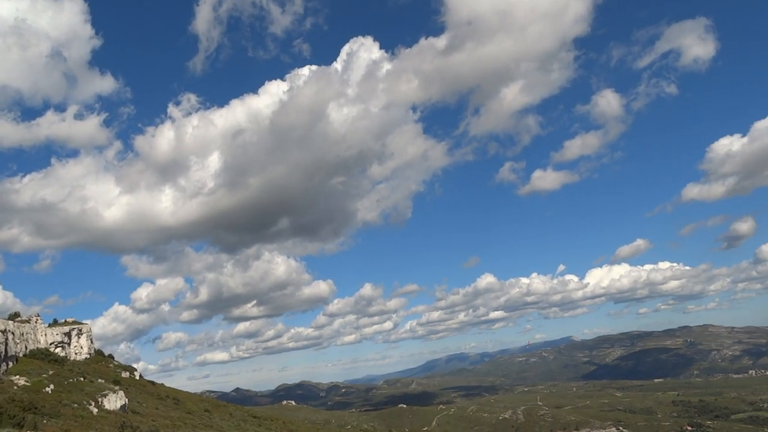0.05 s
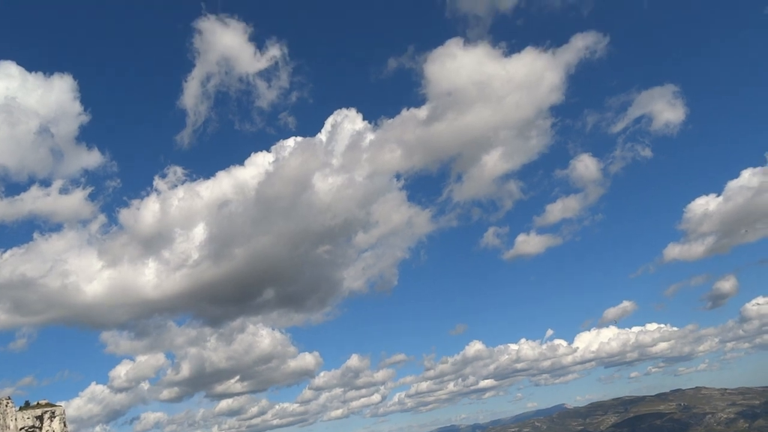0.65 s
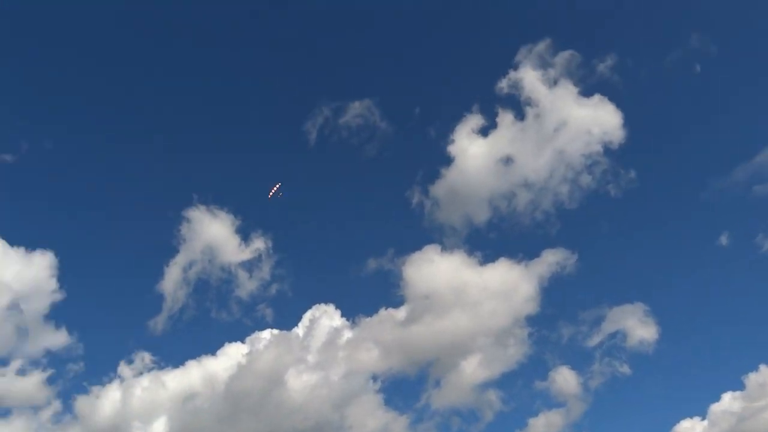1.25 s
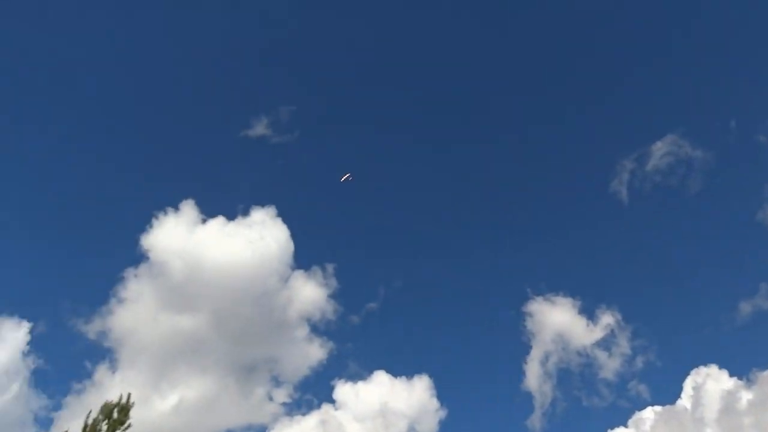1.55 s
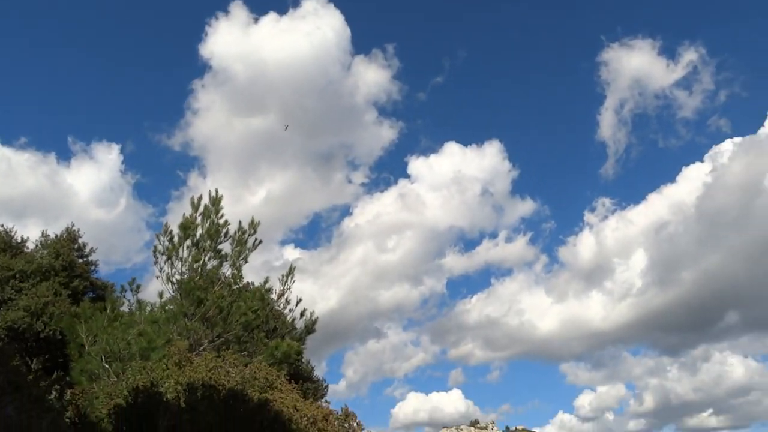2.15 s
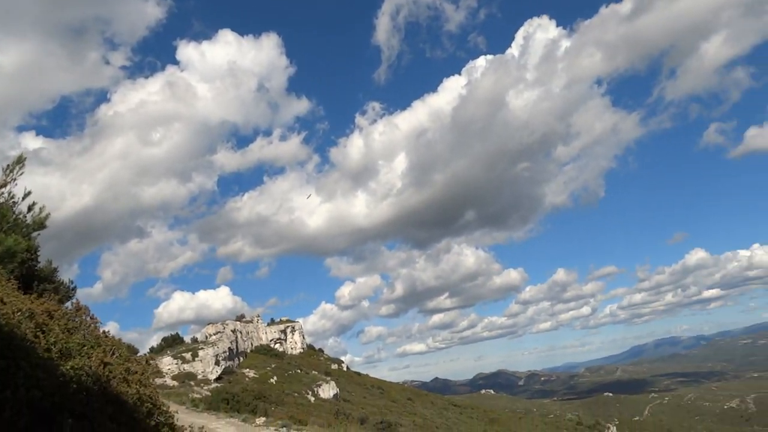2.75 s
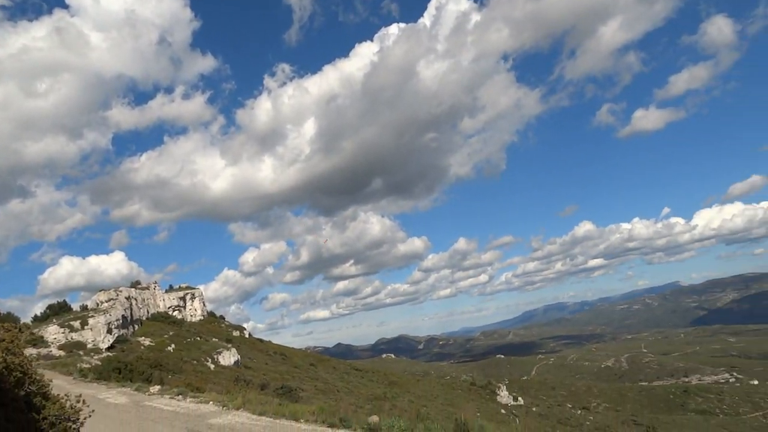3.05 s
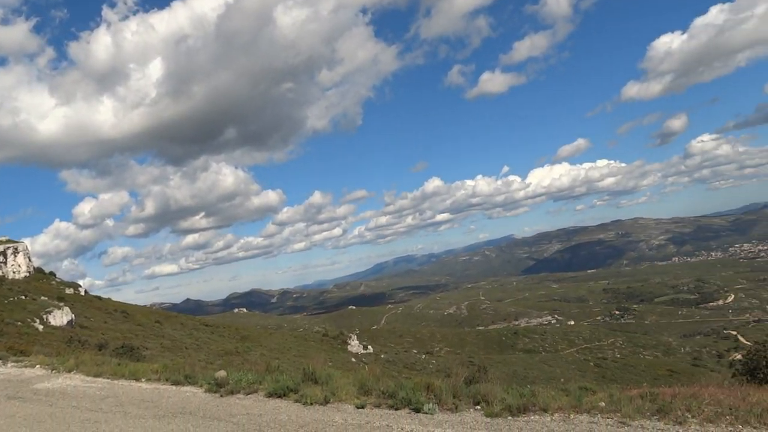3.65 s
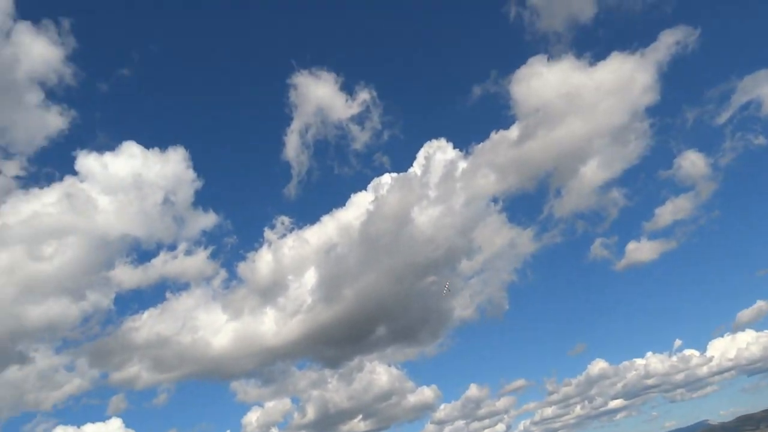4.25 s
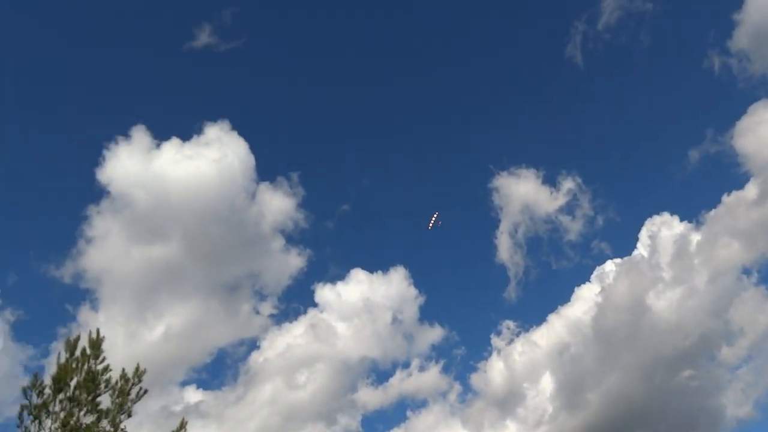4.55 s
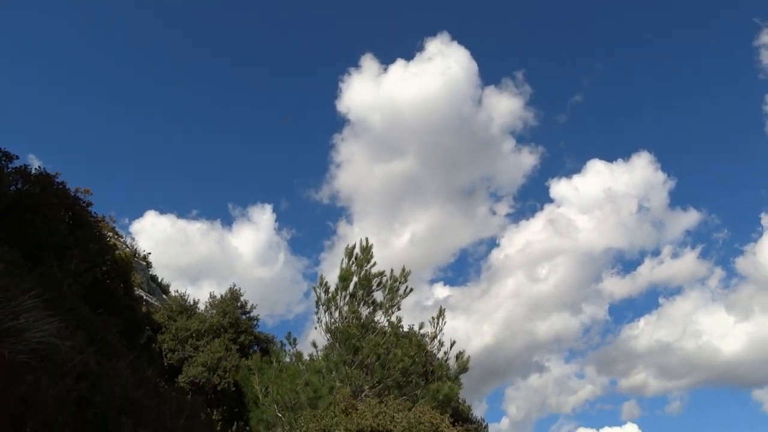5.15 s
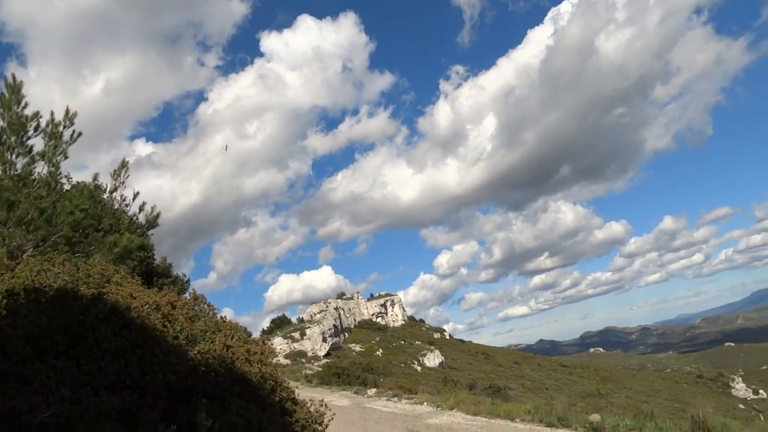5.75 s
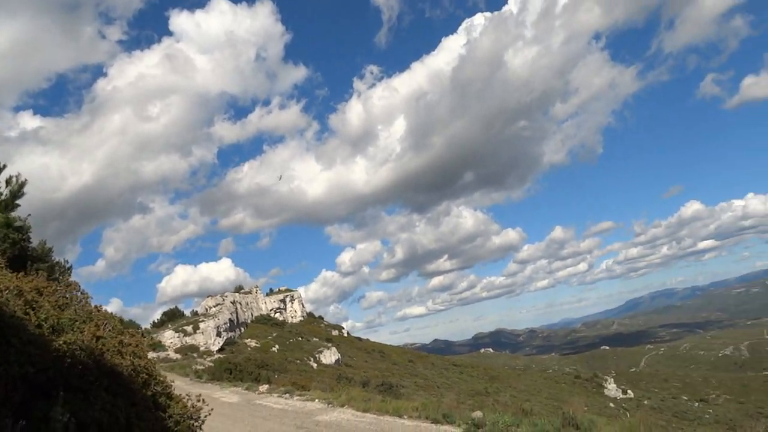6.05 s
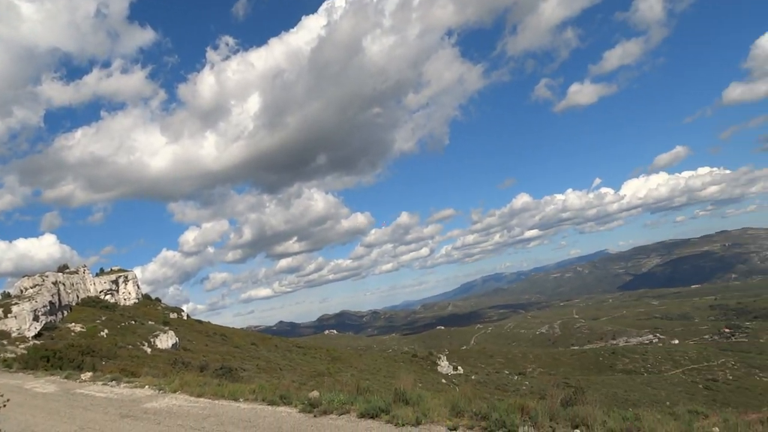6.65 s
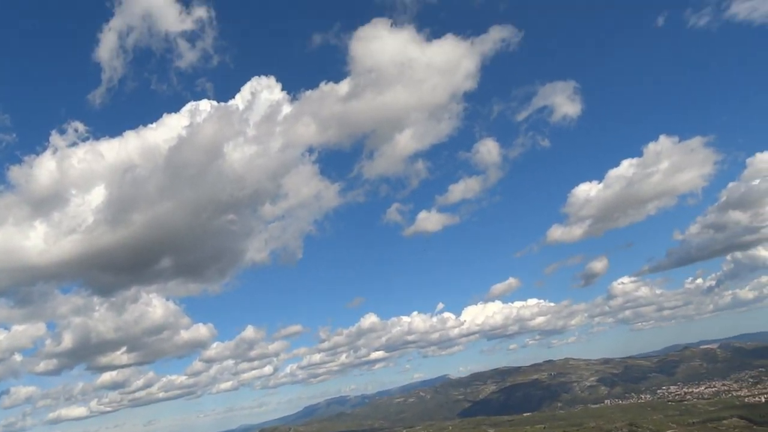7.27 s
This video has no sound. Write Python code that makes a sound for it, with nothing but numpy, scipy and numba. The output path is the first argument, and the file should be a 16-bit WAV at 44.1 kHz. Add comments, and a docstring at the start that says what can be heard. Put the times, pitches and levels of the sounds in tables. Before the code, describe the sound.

A fast model glider whooshes past twice in gusty air, hissing and faintly whistling, with wind buffeting the microphone.

```python
"""First comes an airy rush with a brief whistle: a fast model glider flying laps over a windy ridge.
It sweeps close by twice. Its wake roars, its wings rush and hiss, and its sharp edges whistle,
holding longer notes in the far turns. Gusty air makes it all surge and flutter.
The ground and the hillside echo it, and wind buffets the microphone as it swings after the plane."""
import sys
import numpy as np
from scipy import signal
from scipy.fft import rfft, irfft, next_fast_len
from scipy.io import wavfile
from scipy.ndimage import uniform_filter1d
from numba import njit

SR = 44100
rng = np.random.default_rng(int(sys.argv[2]) if len(sys.argv) > 2 else 0)


def dump(signal):
    """Clip the signal to [-1, 1] and save it as 16-bit WAV at the path in sys.argv[1]."""
    limited = np.clip(np.atleast_2d(signal).T, -1, 1)
    pcm = np.round(limited * 32767).astype(np.int16)
    wavfile.write(sys.argv[1], SR, pcm)


N = 326781
TIME = np.arange(N) / SR
LAP_S = 3.3236  # time to fly one lap


def undb(db):
    """Turn decibels into a number to multiply a sound by."""
    return 10 ** (np.asarray(db) / 20)


def noise(spectrum):
    """Noise of strength 1, coloured by rows of pitch_hz, level_db that set the balance of low and high."""
    hz, db = np.transpose(spectrum)
    size = next_fast_len(N)
    bins_hz = np.maximum(np.arange(size // 2 + 1) * SR / size, 1)
    colour = undb(np.interp(np.log(bins_hz), np.log(hz), db, left=-80, right=-80))
    x = irfft(rfft(rng.standard_normal(size)) * colour, size)[:N]
    return x / x.std()


def wobble(rate_hz):
    """A smooth random wobble of typical size 1 that changes about rate_hz times a second."""
    span = max(int(SR / rate_hz), 2)
    x = uniform_filter1d(rng.standard_normal(N), span, mode="wrap")
    x = uniform_filter1d(x, span, mode="wrap")
    return x / x.std()


def surge(peak_s, rise_s, fall_s):
    """A smooth hump that swells to 1 and dies away at its own pace."""
    age = TIME - peak_s
    return np.exp(-np.minimum((age / np.where(age < 0, rise_s, fall_s)) ** 2, 20))


def lowpass(x, top_hz, order=1):
    """Dull a sound by turning down what lies above top_hz."""
    return signal.sosfilt(signal.butter(order, top_hz, fs=SR, output="sos"), x)


@njit
def resonate(x, hz, width_hz):
    """Let through one band of a sound, at full strength at its moving centre."""
    y, band_state, low_state = np.empty(len(x)), 0., 0.
    for i in range(len(x)):
        step, damping = np.tan(np.pi * hz[i] / SR), width_hz / hz[i]
        band = (band_state + step * (x[i] - low_state)) / (1 + step * (step + damping))
        band_state = 2 * band - band_state
        low_state += 2 * step * band
        y[i] = damping * band
    return y


# Every lap the glider runs up, sweeps close by, moves away and turns.
# Columns: lap_time_s, roar_db, rush_db, swish_db, hiss_db, sizzle_db, rush_pitch_hz
LAP_LEVELS = [(-0.01, -63.5, -59, -62.5, -60, -77.5, 1159.0), (0.35, -59.5, -55.5, -63.5, -64.5, -84, 1890),
              (0.54, -65, -56, -59.5, -69, -86, 2490), (0.85, -67, -52.5, -54.5, -53.5, -73, 2510),
              (1.1, -50.5, -44.5, -53, -44, -57, 2740), (1.25, -55.5, -45.5, -47.5, -42.5, -50, 1580),
              (1.41, -52, -46.5, -51, -45.5, -54, 1488.0), (1.64, -58, -46.5, -48.5, -41.5, -49, 2240),
              (2.02, -66.5, -54.5, -56.5, -55.5, -66.5, 1980), (2.06, -70.5, -55, -57.5, -53.5, -69, 1630),
              (2.43, -69, -54.5, -59.5, -64.5, -76, 1920), (2.59, -65.5, -51, -55.5, -58, -77, 1910),
              (2.69, -69.5, -58.5, -58.5, -59, -75.5, 1178.0), (3.08, -66.5, -62.5, -56.5, -56, -83, 2060)]
# No lap is flown quite like another. Columns: time_s, roar_change_db, rush_change_db, hiss_change_db
SLOW_DRIFT = [(0.0, 3.5, 3.5, -0.6), (0.8, 2, -0.58, 1.72), (2.0, 3.5, 0.92, 0.29), (2.9, 1, -2, -2),
              (3.5, -1.5, 0.41, -1.2), (4.2, -5.5, -1.5, 1.41), (5.3, 2.53, 0.5, -2), (6.1, -3.5, -3, 0.5),
              (6.5, -7.5, -2, 0), (7.41, 6, 3, -5)]
# The glider whooshes as it cuts through a gust.
# Columns: peak_s, rise_s, fall_s, roar_boost_db, rush_boost_db, hiss_boost_db
WHOOSHES = [(0.174, 0.019, 0.05, -2, 3, -1), (0.283, 0.065, 0.058, 2.5, 0, 4.5),
            (0.55, 0.0404, 0.0567, 3.5, 7.5, 3), (0.7, 0.039, 0.047, 3.5, 6, 1.5),
            (0.886, 0.0247, 0.0595, 12.5, 9, 8.5), (0.974, 0.0174, 0.029, 4, 5.5, 2.5),
            (1.066, 0.0103, 0.0207, 1, 8, 11), (1.104, 0.011, 0.0124, 6.5, 4, 5.5),
            (1.187, 0.0373, 0.0206, 6, 4.5, 6), (1.426, 0.0113, 0.038, 1.5, 4, 4.5),
            (1.505, 0.024, 0.0384, -1, 3, 2.5), (1.617, 0.0177, 0.0073, -2, 8, 5.5),
            (1.928, 0.025, 0.05, 1.5, 6, -0.5), (2.038, 0.025, 0.0186, 2.5, 7, -4),
            (2.135, 0.019, 0.022, 3.5, 2.5, 1), (2.237, 0.0163, 0.042, 2, 4.5, 3.5),
            (2.312, 0.0283, 0.04, 3, 6, 4), (2.455, 0.024, 0.025, 4.5, 4, -1),
            (2.59, 0.0226, 0.041, 0, 4, -1), (2.686, 0.0354, 0.0336, 5, 12.5, -5.5),
            (3.05, 0.021, 0.064, 3, 4, -1.5), (3.47, 0.106, 0.0396, 10.5, 5.5, -2),
            (3.64, 0.058, 0.129, 0, 2.5, 1.4), (3.831, 0.0904, 0.0548, 7.5, 13, 6),
            (3.925, 0.016, .025, 1, 2.5, -0.5), (3.991, 0.148, 0.08, 9.5, 5, 4.5),
            (4.336, 0.015, 0.016, 2.5, 8.5, 9), (4.415, 0.118, 0.0277, -3.5, 0.5, 5.5),
            (4.693, 0.0203, 0.0315, 5, 6.5, 8), (4.76, 0.033, 0.0518, 11, 9, 0.5),
            (4.877, 0.024, 0.0152, 5, 5.5, 4), (4.949, 0.067, 0.062, 5, 2.5, 1.18),
            (5.08, 0.0186, 0.0633, 0.5, 8, 1), (5.17, 0.019, 0.106, 3, 7.5, -2),
            (5.54, 0.111, 0.156, -1, 7.5, 1.5), (5.762, 0.0324, 0.0238, 0.5, 13, 5.5),
            (5.7, 0.03, 0.0236, -1.5, 4.5, 1), (5.858, 0.0152, 0.0123, -2.5, 7.5, 6.5),
            (6.143, 0.027, 0.089, 5, 3.5, 4), (6.355, 0.0224, 0.0203, 6, 5.5, 3.5),
            (7.052, 0.0285, 0.0277, 2.5, 3.5, -0.58), (7.12, 0.0455, 0.107, 1.5, 4, -1),
            (7.176, 0.0221, 0.0277, 0, 11.5, 3.5), (7.36, 0.025, 0.0356, -2.5, 4.5, 5.5)]
def flight(sizzle_share=0.61):
    """Lap, drift and whooshes add up to each part's level in dB; the lap also sets the rush's pitch."""
    times, *columns = np.transpose(LAP_LEVELS)
    roar, rush, swish, hiss, sizzle, rush_hz = (np.interp(TIME, times, c, period=LAP_S) for c in columns)
    times, *columns = np.transpose(SLOW_DRIFT)
    drift = np.array([np.interp(TIME, times, c) for c in columns])
    whooshes = sum(np.outer(boosts, surge(peak, rise, fall)) for peak, rise, fall, *boosts in WHOOSHES)
    low, mid, high = drift + whooshes
    return (roar + low, rush + mid, swish + (mid + high) / 2,
            hiss + high, sizzle + sizzle_share * high, rush_hz)


def eddies(x, count=4, depth_db=2.4):
    """Large eddies (whirls of air) make wandering bands of noise swell and fade, each on its own."""
    out = x.copy()
    for hz in np.geomspace(1400, 3600, count):
        change = undb(depth_db * wobble(16)) - 1
        out += change * resonate(out, hz * (1 + .07 * wobble(7)), hz / 6)
    return out / out.std()


def swirl(x, count=3, lift=.55):
    """Eddies of changing size lift narrow bands that wander through the hiss."""
    out = x.copy()
    for hz in np.geomspace(5800, 9600, count):
        out += lift * resonate(x, hz * (1 + .06 * wobble(9)), hz / 14)
    return out / out.std()


# The noise colour of each part of the glider, lowest first. Columns: pitch_hz, level_db
WAKE_ROAR = [(150, -15), (290, -18.5), (400, -3), (600, 1.5), (760, 1.5), (980, 2.5), (1400, -3),
             (2500, -60)]
WING_RUSH = [(600, -30.5), (1030, -4.5), (1330, 0), (2000, -0.5), (2800, -1.5), (3600, -6.5), (5500, -16),
             (10000, -36)]
TAIL_SWISH = [(2000, -29), (3000, -3), (3600, -2), (4500, -1.5), (5500, -1.5), (7000, -5.5), (10000, -26)]
EDGE_HISS = [(3500, -5), (4700, -3), (5600, 0), (7000, 4), (7900, -0.5), (8400, -1.5), (9000, -7.5),
             (10000, -16.5), (11500, -41.5), (15500, -49.5)]
TOP_SIZZLE = [(6500, -11), (8300, 0.5), (9500, -0.5), (11000, -4.5), (12500, -12.5), (14000, -18),
              (15500, -35)]
def airframe(rush_width_hz=1907.0):
    """Air churns in the wake and off wings, tail and rear edges: thinner parts make higher noise."""
    roar_db, rush_db, swish_db, hiss_db, sizzle_db, rush_hz = flight()
    roar = noise(WAKE_ROAR) * undb(roar_db + 1.35 * wobble(43))
    # the pitch of the wings moves with speed, and as the plane comes and goes (Doppler shift)
    wings = resonate(noise(WING_RUSH), rush_hz, rush_width_hz)
    rush = eddies(wings) * undb(rush_db + 1.407 * wobble(90))
    swish = eddies(noise(TAIL_SWISH)) * undb(swish_db + 1.88 * wobble(80))
    hiss = swirl(noise(EDGE_HISS)) * undb(hiss_db + 1.33 * wobble(110))
    sizzle = swirl(noise(TOP_SIZZLE)) * undb(sizzle_db + 1.8 * wobble(60))
    return roar + rush + swish + hiss + sizzle


def edge_tone(hz, width_hz):
    """An edge sheds tiny whirls at a pitch and rough air shakes them. The sound is the .real part."""
    jitter = rng.standard_normal((2, len(hz) + SR // 10))  # the extra length lets the filter settle
    shake = lowpass(jitter, width_hz / 2, order=2)[:, -len(hz):]
    tone = (shake[0] + 1j * shake[1]) * np.exp(2j * np.pi * np.cumsum(hz) / SR)
    return tone / tone.real.std()


# Short whistles; wider ones sound rougher.
# Columns: start_s, length_s, first_pitch_hz, last_pitch_hz, level_db, width_hz
EDGE_CHIRPS = [(-.02, 0.1236, 5130, 5242, -49.5, 350), (0.87, 0.032, 6030, 5930, -42, 350),
               (0.946, 0.062, 7940, 8200, -43.5, 450), (1.15, 0.177, 12900, 12300, -65, 600),
               (1.32, 0.107, 11900, 10400, -61.5, 450), (1.415, 0.124, 10050, 9490, -47.5, 600),
               (1.114, 0.023, 6100, 5940, -35.5, 350), (1.131, 0.036, 6020, 5840, -39, 350),
               (1.228, 0.0698, 6075, 5554, -35.5, 500), (1.416, 0.0724, 5350, 4952, -41, 450),
               (1.492, 0.171, 6323, 6073, -42, 300), (1.507, 0.165, 9250, 8727, -42.5, 170),
               (1.67, 0.127, 9280, 8920, -45.5, 150), (1.735, .14, 4830, 4494, -51, 500),
               (2.035, 0.248, 6940, 6560, -60.5, 201), (2.6, 0.195, 6850, 6870, -56, 130),
               (2.666, 0.0252, 6800, 6850, -49, 130), (2.762, 0.097, 6800, 5160, -57, 806),
               (4.154, 0.0994, 6500, 7115, -51.5, 214), (4.325, 0.023, 6646, 6420, -36.5, 400),
               (4.366, 0.0592, 6652, 6480, -34, 160), (4.459, 0.0537, 5570, 5720, -38.5, 350),
               (4.544, 0.0365, 5370, 5200, -44.5, 300), (4.944, 0.086, 4964, 5157, -44, 550),
               (4.836, 0.0787, 9500, 9300, -45.5, 450), (5.048, 0.091, 5100, 4930, -50.5, 251),
               (5.937, 0.102, 6900, 5040, -56.5, 600), (6.363, 0.104, 5650, 5960, -55.5, 350),
               (6.5, 0.125, 4457, 4517, -57.5, 199.5)]
def chirps(breath_spread=4, breath_db=-5.0, waver_hz=70, flutter_db=2):
    """Gaps and edges sing brief, ragged, breathy notes as the airflow sweeps through their range."""
    out = np.zeros(N)
    waver, flutter = waver_hz * wobble(130), flutter_db * wobble(160)
    for start, length, first_hz, last_hz, db, width_hz in EDGE_CHIRPS:
        progress = (TIME - start) / length
        on = (progress > 0) & (progress < 1)
        hz = first_hz + (last_hz - first_hz) * progress[on] + waver[on]
        tone = edge_tone(hz, width_hz) + undb(breath_db) * edge_tone(hz, breath_spread * width_hz)
        out[on] += tone.real * undb(db + flutter[on] - flutter_db / 2) * np.sin(np.pi * progress[on])
    return out


def gusty_air(flutter_db=0.6547, sway_db=0.0582):
    """Moving air keeps the loudness fluttering and swaying."""
    return undb(flutter_db * wobble(72) + sway_db * wobble(25))


def ground_echo(x, share=0.056, dull_hz=3000, mic_height_m=1.6, sound_m_per_s=343):
    """The bounce off the ground comes later as the plane climbs, giving the noise a faint sweep."""
    low_deg, climb_deg = 8.25, 36  # angle above the horizon: low in the turns, steep on the close pass
    highest_s, climb_s = 1.2, 0.54
    from_highest = (TIME % LAP_S - highest_s) / climb_s
    angle_deg = low_deg + climb_deg / (1 + from_highest ** 2 / 2) ** 2
    delay_s = 2 * mic_height_m * np.sin(np.radians(angle_deg)) / sound_m_per_s
    return share * lowpass(np.interp(TIME - delay_s, TIME, x), dull_hz)


def rock_echoes(x, count=5, share=.08):
    """Stones close by add faint, quick echoes whose delays drift as the plane circles."""
    out = np.zeros(N)
    for _ in range(count):
        delay_s = rng.uniform(.003, .01) + .0006 * wobble(.8)
        out += share * np.interp(TIME - delay_s, TIME, x, left=0)
    return out


def hillside_echo(x, ring_s=0.224, dull_hz=1800, level_db=-11):
    """Rocks and scrub scatter a soft, dull tail of sound, different in each ear."""
    fade = np.exp(-np.log(1000) * TIME[:SR] / ring_s)  # 60 dB down after ring_s
    tail = rng.standard_normal((2, SR)) * fade
    tail = lowpass(tail / np.linalg.norm(tail, axis=1, keepdims=True), dull_hz)
    return undb(level_db) * signal.fftconvolve(x[None], tail, axes=1)[:, :N]


# How far to the left the glider sounds. Columns: time_s, left_minus_right_db
SIDE_BALANCE = [(0, .6), (.5, 0), (1.8, -0.1), (2.56, 2), (2.9, 1.5), (3.65, -0.13), (4.4, -0.5),
                (5.2, -0.2), (5.74, 2), (6.1, 2.5), (6.5, 1.3), (7.41, 0)]
def pan(glider, top_hz=5570):
    """The glider drifts left as it moves away; the two sides differ in level only below top_hz."""
    balance_db = np.interp(TIME, *np.transpose(SIDE_BALANCE))
    side_gains = undb(np.array([balance_db, -balance_db]) / 2)
    body = signal.sosfiltfilt(signal.butter(6, top_hz, fs=SR, output="sos"), glider)
    return glider + body * (side_gains - 1)


# Noise colours of the breeze: shared by both ears, and differing between them.
# Columns: pitch_hz, level_db
BREEZE_SHARED = [(20, -26), (60, -5), (100, 0.5), (280, -23), (600, -0.5), (1500, 7), (4000, 2.5),
                 (8000, -29.5), (11000, -19.5), (15500, -20)]
BREEZE_SIDES = [(20, -33.5), (80, -17), (280, -21.5), (600, -0.5), (1500, 13.5), (4000, 6.5), (8000, -38),
                (11000, -24), (15500, -30.5)]
def breeze(level_db=-71):
    """A light breeze stirs the scrub, slowly rising and falling."""
    stir = undb(level_db + 0.55 * wobble(2.5))
    return stir * (noise(BREEZE_SHARED) + noise(BREEZE_SIDES) * np.array([[1], [-1]]))


# Gusts on the microphone, strongest as it swings after the plane.
# Columns: peak_s, level_db, rise_s, fall_s
MIC_GUSTS = [(0.33, -71, 0.34, 0.236), (0.739, -66.5, 0.0146, 0.015), (0.9, -71, 0.053, 0.08),
             (1.27, -49.5, 0.169, 0.178), (1.55, -53.5, 0.088, 0.058), (1.72, -63, 0.053, 0.117),
             (2.146, -75, 0.344, 0.14), (3.45, -65.5, 0.258, 0.25), (3.572, -62, 0.0244, 0.029),
             (3.85, -74, 0.149, 0.146), (4.035, -54, 0.0217, 0.037), (4.35, -51, 0.0806, 0.217),
             (4.64, -45.5, 0.145, 0.22), (4.88, -45.5, 0.162, 0.061), (5.07, -50.5, 0.06, 0.037),
             (5.157, -56.5, 0.021, 0.0256), (5.28, -71, 0.17, 0.154), (7.02, -74.5, 0.184, 0.2)]
def gust_level(calm_db=-86.5, unsteady_db=1.86):
    """The wind's level in dB: each gust swells and dies away over the calm."""
    gust_power = sum((undb(db) * surge(peak, rise, fall)) ** 2 for peak, db, rise, fall in MIC_GUSTS)
    return 10 * np.log10(undb(calm_db) ** 2 + gust_power) + unsteady_db * wobble(37.5)


# Noise colours of wind on the microphone: shared by both ears, differing between them, and deep rumble.
# Columns: pitch_hz, level_db
WIND_SHARED = [(20, -25.5), (45, -16.5), (80, -14), (130, -2), (200, 1), (350, 0.5), (600, -7), (1100, -16),
               (3000, -58)]
WIND_SIDES = [(30, -42), (80, -18), (150, -3.5), (250, -4), (420, -2.5), (650, -5), (1200, -13),
              (3000, -33.5), (6000, -56)]
WIND_RUMBLE = [(25, -18.5), (55, -12), (95, -1.5), (130, -2), (200, -8), (400, -29)]
def mic_wind(thump_db=-2.5, lumpy_db=2.5, rumble_db=-1.5, rumble_limit_db=-67):
    """Eddies thump the microphone's two openings, more separately in strong gusts, over a soft rumble."""
    gust_db = gust_level()
    separation = np.clip(0.91 + 0.0094 * (gust_db + 41.0), .15, 1)
    shared = noise(WIND_SHARED) * undb(gust_db + thump_db + lumpy_db * wobble(52.2)) + pops()
    sides = separation * noise(WIND_SIDES) * undb(gust_db + thump_db + lumpy_db * wobble(55))
    rumble = noise(WIND_RUMBLE) * undb(np.minimum(gust_db + rumble_db, rumble_limit_db))
    return shared + rumble + sides * np.array([[1], [-1]])


# Bands of the glider's noise that grow louder or softer as it tilts.
# Columns: start_s, length_s, first_pitch_hz, last_pitch_hz, width_hz, change_db
TILT_BANDS = [(0.15, 0.69, 770, 780, 170, 4), (0.15, 0.71, 1210, 1160, 220, 2),
              (0.599, 0.188, 2150, 2080, 400, -8), (0.737, 0.346, 1880, 1748, 905, -11.5),
              (0.752, 0.178, 1140, 1040, 250, 6), (0.786, 0.362, 2960, 2670, 650, 4.5),
              (0.804, 0.46, 460, 454, 150, 4.5), (1.041, 0.13, 800, 760, 220, 5),
              (1.301, 0.437, 878, 820, 150, 5.5), (1.098, 0.187, 3250, 3100, 640, 3.5),
              (1.099, 0.73, 2220, 2040, 410, 2), (1.684, 1.08, 425, 417, 230, -11.5),
              (1.736, 1.05, 5010, 4570, 1510, -7.5), (1.997, 1.12, 1850, 1920, 260, 2),
              (2.093, 0.363, 3510, 3950, 600, 4.5), (2.11, 0.198, 2600, 2780, 300, 1.5),
              (2.32, .3, 2900, 2750, 450, -0.5), (2.48, 0.236, 3770, 3730, 600, 5.5),
              (2.8, 0.62, 1870, 1950, 300, 4), (2.997, 0.28, 3500, 3450, 500, 4),
              (3.1, 1.12, 448, 418, 140, 3), (3.3, 0.98, 706, 785, 162, 5.5),
              (3.531, 0.545, 1590, 1420, 280, 7), (3.6, 0.29, 1840, 2090, 240, 2),
              (3.604, 0.457, 2820, 2800, 700, -2), (3.96, 0.127, 2930, 2930, 300, 8.5),
              (4.066, 0.374, 1910, 1596, 1100, -5.5), (4.252, 0.27, 3430, 3340, 600, 5),
              (4.498, 0.642, 605, 683, 130, 9), (4.603, 0.663, 2270, 2190, 380, 4.5),
              (4.677, 0.34, 1610, 1520, 300, 2.5), (4.69, 0.145, 3150, 3050, 800, 0.5),
              (4.674, 0.312, 5340, 5240, 1500, -6.5), (4.994, 1.003, 414, 412, 230, -8.5),
              (5.054, 1.065, 4980, 4040, 1310, -4), (5.4, 0.578, 1846, 1680, 480, 5.5),
              (5.39, 0.7, 2417, 2335, 300, -6), (5.43, 0.139, 3070, 3070, 320, 7.5),
              (5.684, 0.246, 3200, 3150, 450, 5.5), (6.072, 0.93, 1401, 1503, 130, 7),
              (6.703, 0.405, 670, 666, 140, 5.5), (6.706, 0.35, 1105, 1100, 140, 3.5),
              (7.012, 0.493, 1444, 1480, 260, 6.5), (7.094, 0.367, 2680, 2630, 400, 3.5)]
def tilting(x, fade_s=0.0598, flicker=0.279):
    """As the plane tilts, bands of its noise swell or hollow out, glide and flicker, then return."""
    x = x.copy()
    unsteady = 1 + flicker * wobble(39)
    for start, length, first_hz, last_hz, width_hz, db in TILT_BANDS:
        on = (TIME > start) & (TIME < start + length)
        age = TIME[on] - start
        fade = np.minimum(np.minimum(age, length - age) / fade_s, 1)
        fade *= np.roll(unsteady, rng.integers(N))[on]  # each band flickers in its own way
        hz = first_hz + (last_hz - first_hz) * age / length
        x[on] += (undb(db * fade) - 1) * resonate(x[on], hz, float(width_hz))
    return x


# Single eddies that pop on the microphone. Columns: start_s, level_db, decay_s
EDDY_POPS = [(1.278, -46, 0.0142), (1.316, -53, 0.0067), (3.99, -42, 0.0035), (4.014, -53, 0.0052),
             (4.506, -39.5, 0.00354), (4.611, -37.5, 0.0049), (4.885, -40.5, 0.006), (5.153, -46, 0.0048)]
def pops(bass_cut_hz=140):
    """A lone eddy hits the microphone: a soft, dull puff with little bass that dies at once."""
    swell = np.zeros(N)
    for start, db, decay in EDDY_POPS:
        progress = np.maximum(TIME - start, 0) / decay
        swell += undb(db) * 2 * np.sqrt(progress) * np.exp(-progress)
    puffs = swell * (noise(WIND_SHARED) + noise(WAKE_ROAR) / 2)
    return signal.sosfilt(signal.butter(2, bass_cut_hz, "highpass", fs=SR, output="sos"), puffs)


# Long whistles in the far turn. Columns: start_s, hold_s, pitch_hz, tone_db, breath_db
TURN_NOTES = [(2.868, 0.0924, 4845, -50, -53), (3.045, 0.0285, 4837, -50, -57),
              (6.046, 0.031, 4690, -50, -52), (6.138, 0.025, 4824, -44.5, -54.5),
              (6.199, 0.1015, 4813, -48, -51.5), (6.345, 0.0162, 4736, -45.5, -50)]
# The colour of the breathy noise around each note. Columns: pitch_hz, level_db
WHISTLE_BREATH = [(3800, -23.5), (4450, -5), (4900, 1), (5600, 2.5), (6500, -9), (7800, -33.5),
                  (10000, -14.5), (11500, -54)]
def turn_whistle(start_s, hold_s, pitch_hz, tone_db, breath_db):
    """Under load in the turn, an edge holds a throbbing, sinking note wrapped in breathy noise."""
    rise_db_per_s, fall_db_per_s, sink_hz_per_s = 229.5, 168.5, 334.4
    waver_hz, throb_hz, throb_db, octave_db = 50, 60, 3.0, -24
    age = TIME - start_s  # the note fades in just before start_s
    fade_db = np.minimum(rise_db_per_s * age, 0) - fall_db_per_s * np.maximum(age - hold_s, 0)
    hz = pitch_hz - sink_hz_per_s * np.clip(age, 0, hold_s) + waver_hz * wobble(31.515)
    note = edge_tone(hz, width_hz=200)
    octave = undb(octave_db) * (note ** 2).real / 2
    uneven_hz = throb_hz * (1 + 0.205 * wobble(25.2))
    throb = np.sin(2 * np.pi * np.cumsum(uneven_hz) / SR)
    tone = (note.real + octave) * undb(tone_db + fade_db + throb_db * throb)
    # the breath comes and goes more slowly than the tone, and throbs less
    breath = noise(WHISTLE_BREATH) * undb(breath_db + 0.72 * fade_db + 2.0 * throb)
    return tone + breath


# Moments when the whistle flares into hiss. Columns: peak_s, rise_s, fall_s, level_db
HISS_FLARES = [(2.962, 0.023, 0.0176, -49.5), (3.043, 0.021, 0.085, -47), (3.247, 0.0044, .025, -55.5),
               (6.145, 0.022, 0.023, -53.5), (6.263, 0.0105, .05, -53.5), (6.358, 0.024, .035, -52)]
# The colour of that hiss. Columns: pitch_hz, level_db
FLARE_COLOUR = [(2600, -15.5), (3400, -3), (4200, -4.5), (4800, 1.5), (5700, 3.5), (6500, -2.5),
                (7500, -17.5), (10000, -27.5), (11500, -43)]
def flares(flutter_db=2):
    """The airflow tears loose: short, fluttering bursts of hiss around the pitch of the whistle."""
    swell = sum(undb(db) * surge(peak, rise, fall) for peak, rise, fall, db in HISS_FLARES)
    return swell * noise(FLARE_COLOUR) * undb(flutter_db * wobble(120))


def scene(airframe_db=-0.744):
    """Mix the glider, its echoes and the wind around it into left and right channels."""
    whistles = chirps() + flares() + sum(turn_whistle(*row) for row in TURN_NOTES)
    glider = (undb(airframe_db) * tilting(airframe()) + whistles) * gusty_air()
    glider = glider + ground_echo(glider) + rock_echoes(glider)
    return pan(glider) + hillside_echo(glider) + mic_wind() + breeze()


def record(dry, ring_hz=10650, width_hz=1400, phase_split=0.344, level_split=0.079, top_hz=15600):
    """The microphone's two openings differ where they ring, mostly in timing; the top treble is cut."""
    size = next_fast_len(N)
    bins_hz = np.arange(size // 2 + 1) * SR / size
    ring = np.exp(-((bins_hz - ring_hz) / width_hz) ** 2)
    spectrum = rfft(dry.mean(axis=0), size)
    sides = irfft(spectrum * ring * (level_split - 1j * phase_split), size)[:N]
    stereo = dry + sides * np.array([[-1], [1]])
    return signal.sosfilt(signal.ellip(10, .1, 70, top_hz, fs=SR, output="sos"), stereo)


dry = scene()
out = record(dry)
dump(out)
```